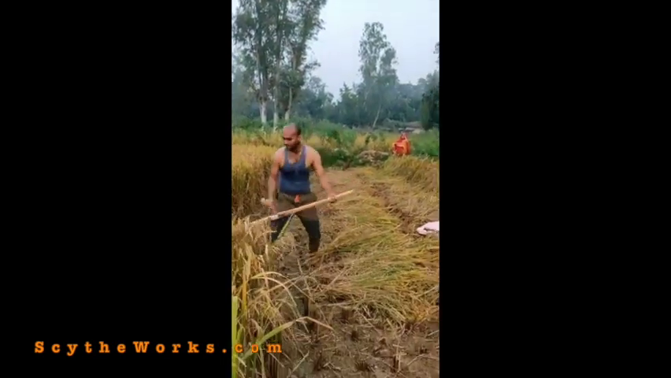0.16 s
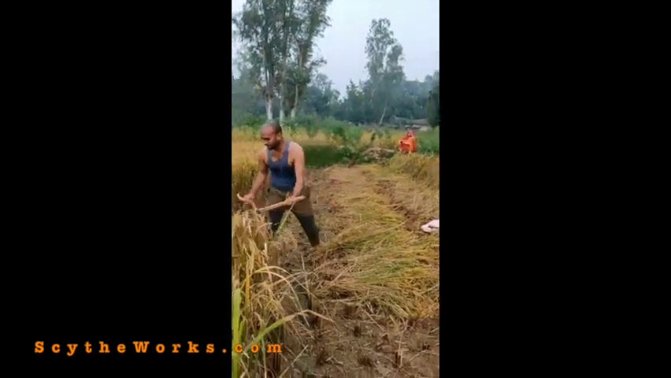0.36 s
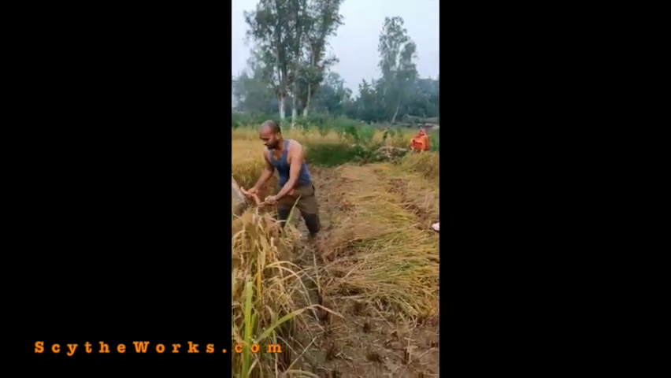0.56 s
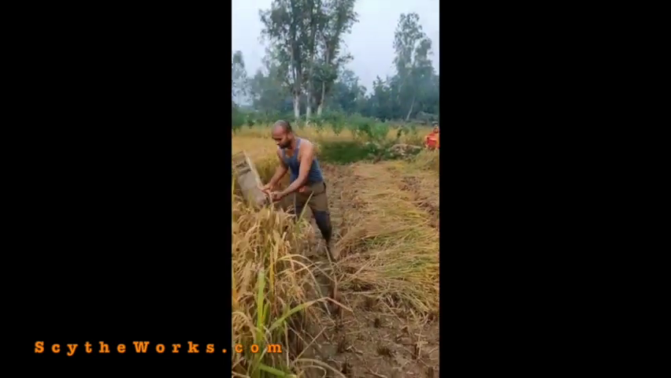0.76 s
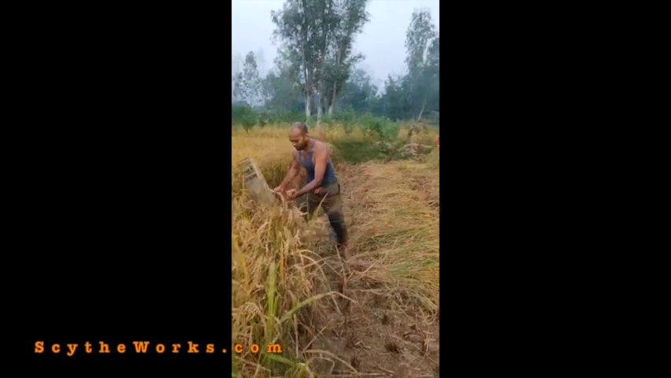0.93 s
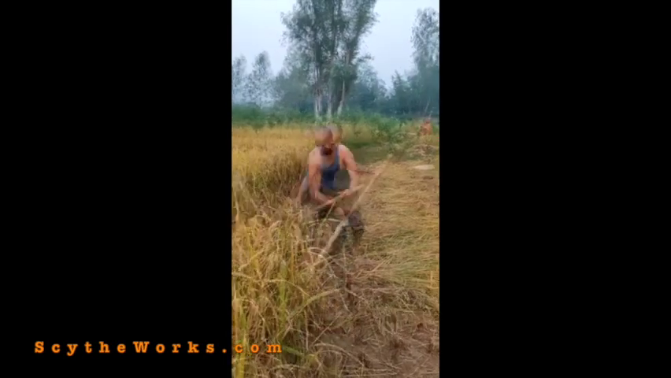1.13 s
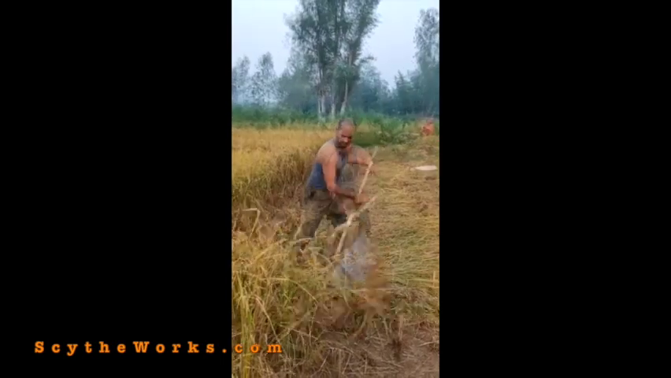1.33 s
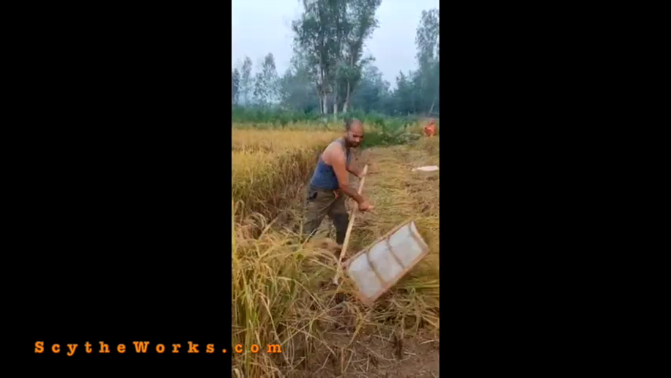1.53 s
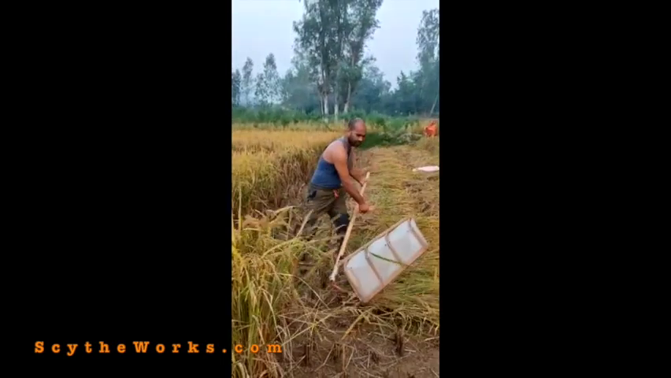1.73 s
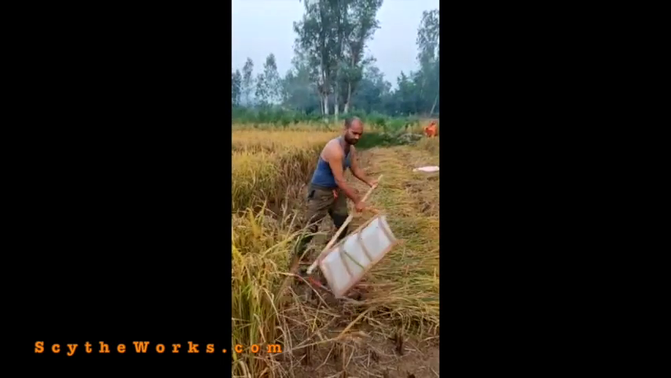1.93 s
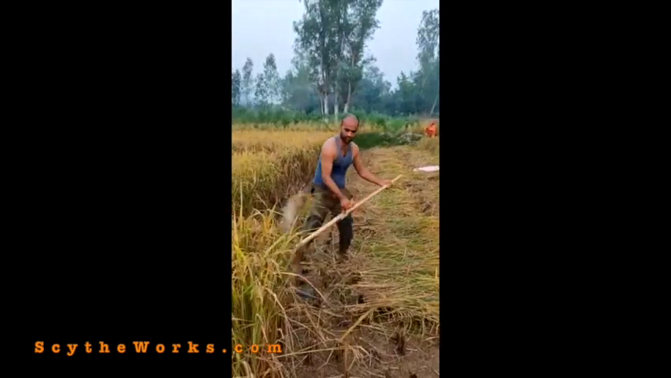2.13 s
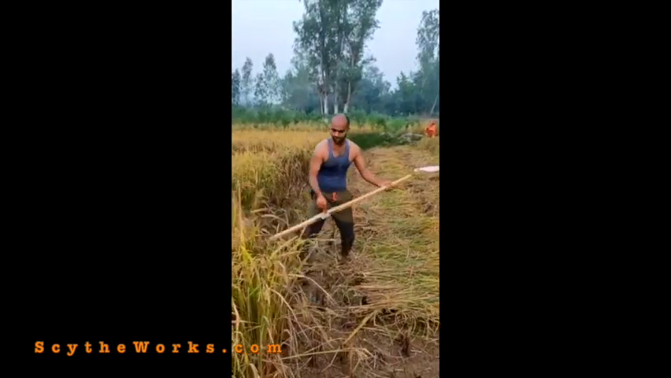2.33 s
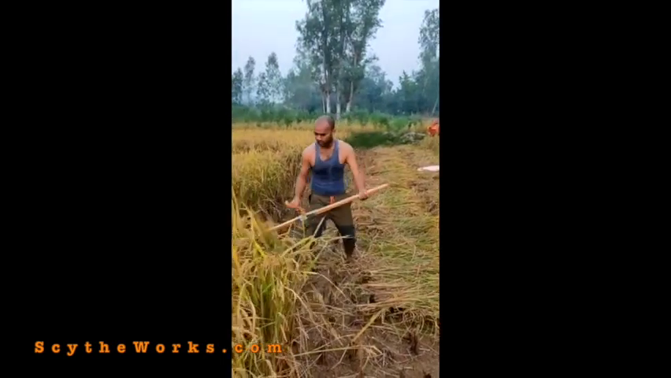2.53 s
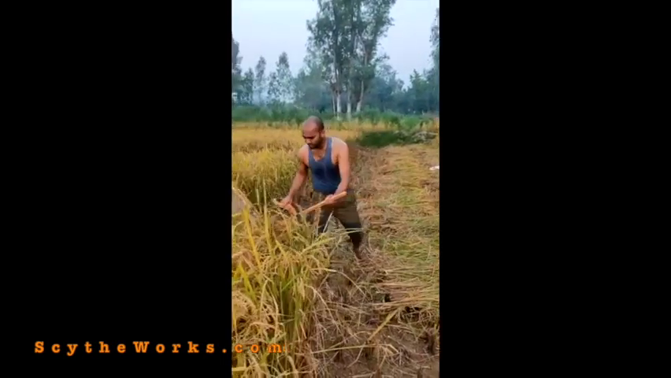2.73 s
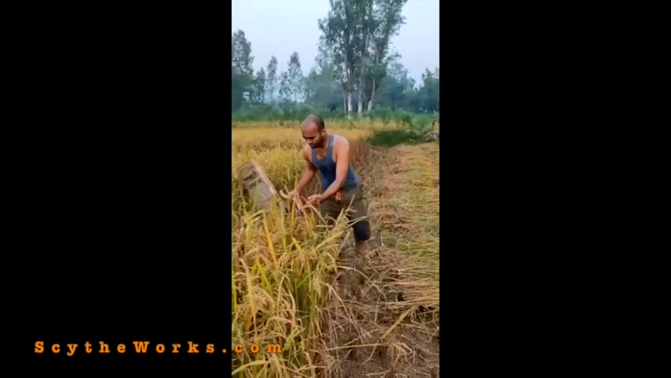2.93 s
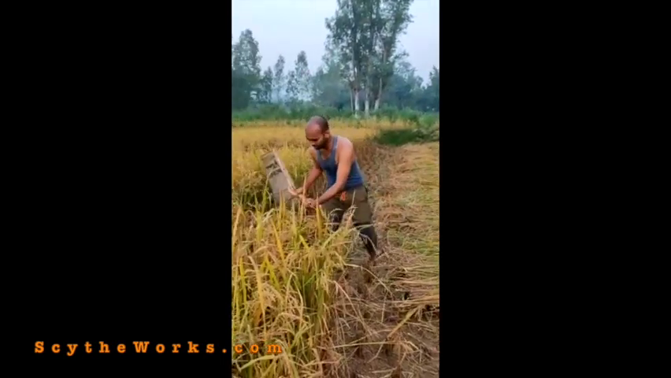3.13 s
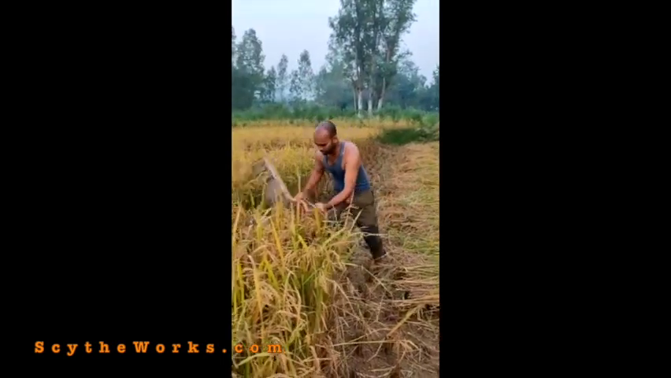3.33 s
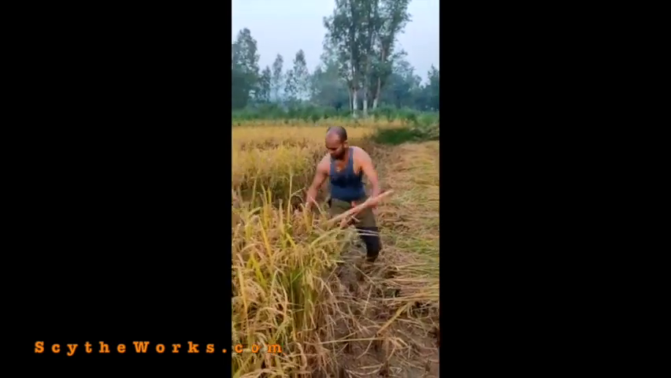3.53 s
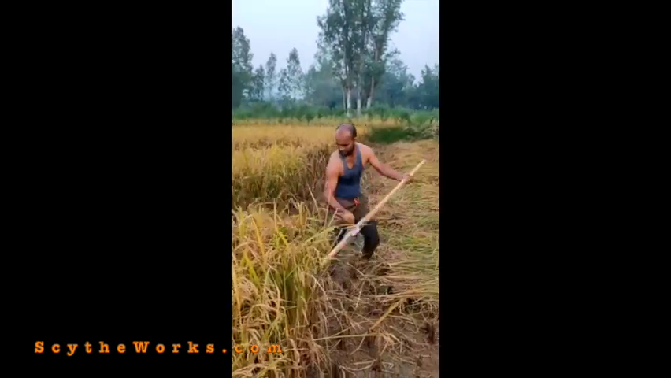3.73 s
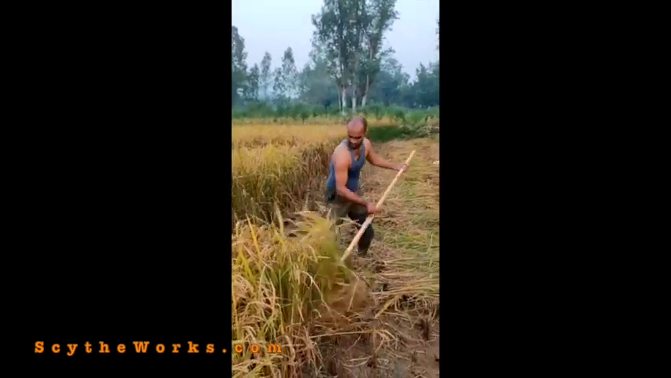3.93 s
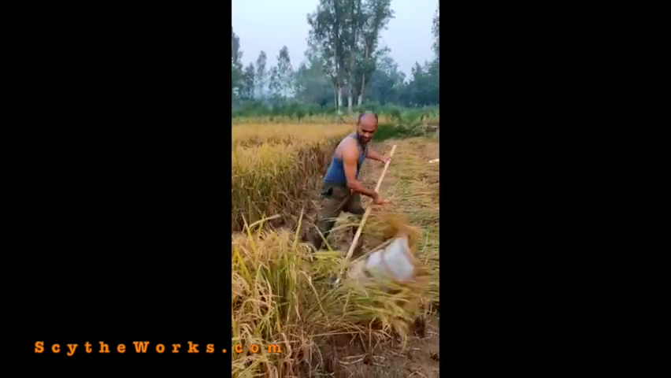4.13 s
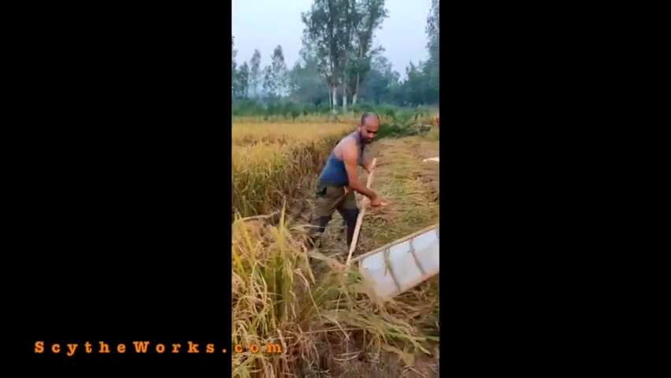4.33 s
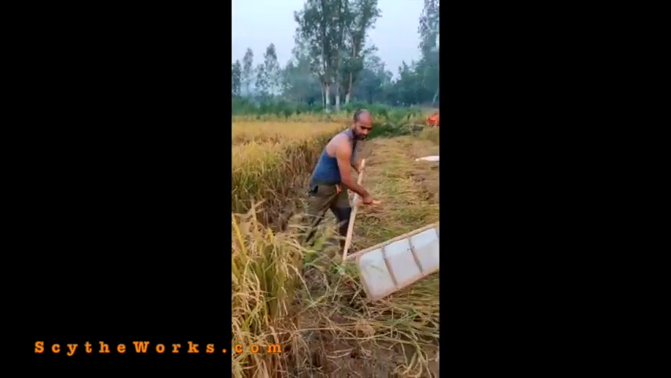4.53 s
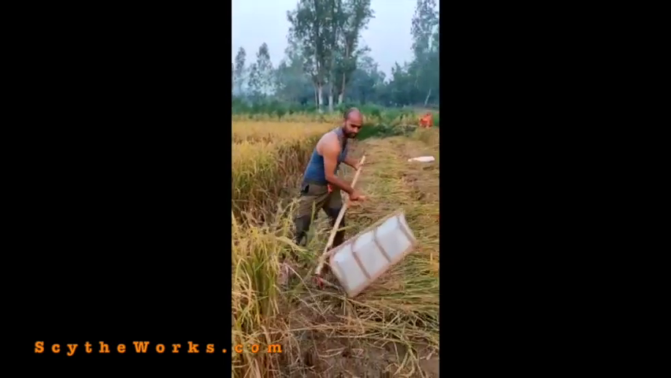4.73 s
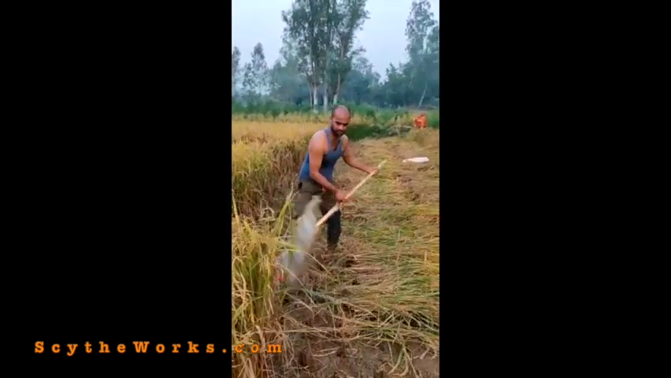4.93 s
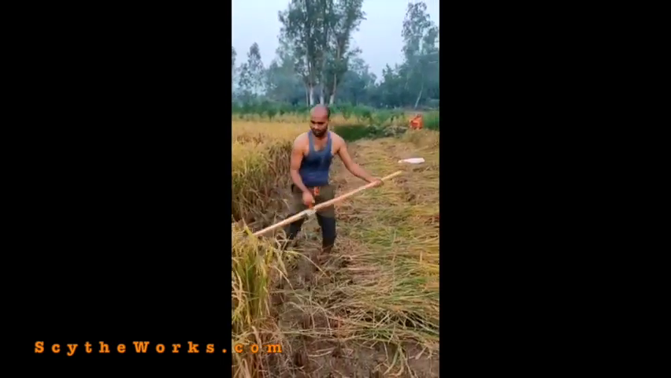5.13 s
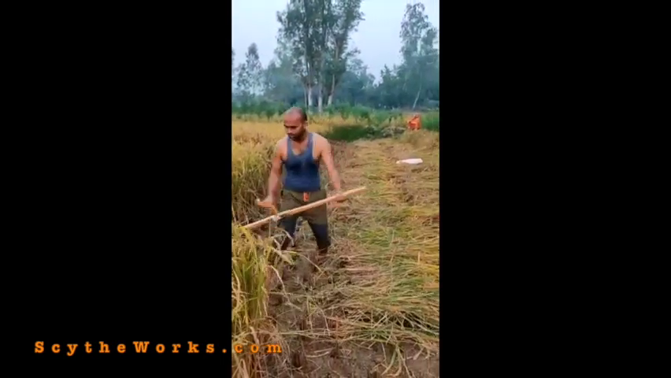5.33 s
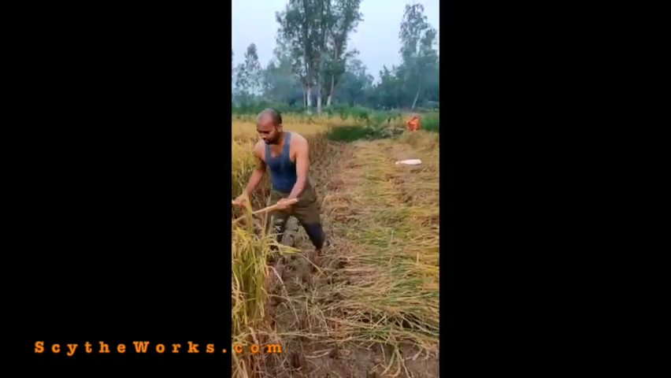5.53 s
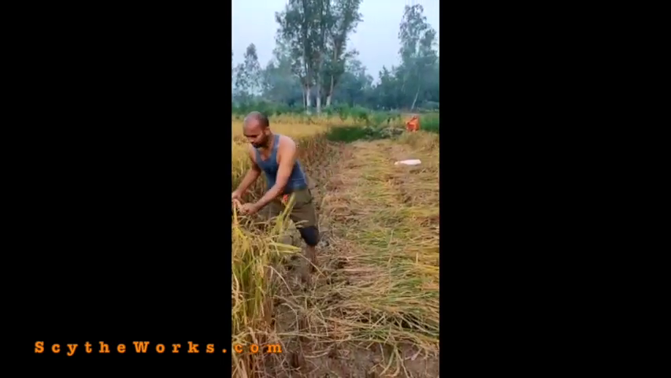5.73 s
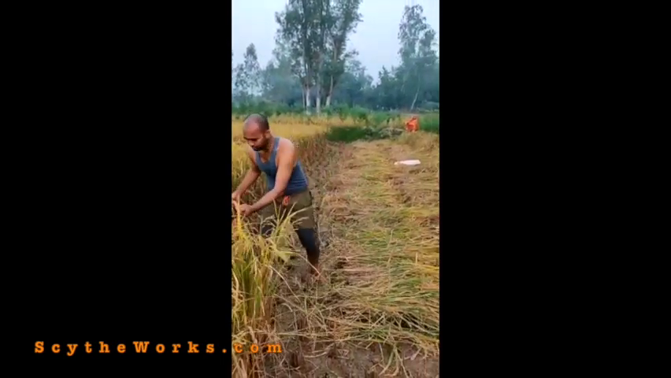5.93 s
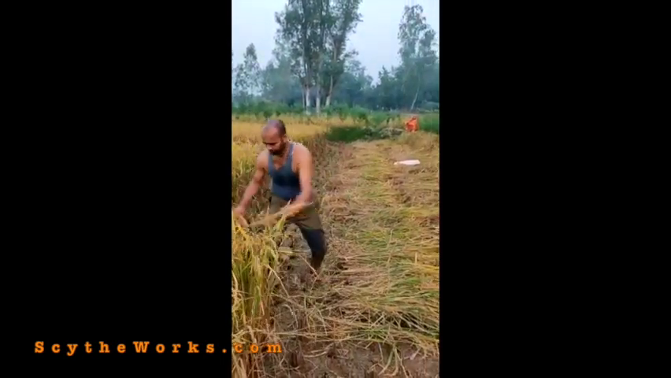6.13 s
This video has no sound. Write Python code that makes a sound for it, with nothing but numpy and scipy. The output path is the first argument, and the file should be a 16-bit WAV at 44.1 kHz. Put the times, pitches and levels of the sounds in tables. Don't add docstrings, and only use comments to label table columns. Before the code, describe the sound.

In a quiet open field, a scythe with a cradle mows dry, ripe grain close to the microphones. Leaves rustle, a first stroke swishes and crunches, and straw slides off. Lighter brushing and small snaps follow, then a much louder crackling stroke with a soft thud. After more scattered rustles and a lull, a third stroke just begins at the end. Far hoarse birds call faintly.

```python
import sys
import numpy as np
from scipy import signal
from scipy.fft import rfft, irfft, next_fast_len
from scipy.io import wavfile
from scipy.ndimage import uniform_filter1d

SR = 44100
rng = np.random.default_rng(int(sys.argv[2]) if len(sys.argv) > 2 else 0)


def invert_db(x):
    u = np.asarray(x, float) / 20
    return 10 ** u


def generate_wav(sig):
    pcm = np.round(np.clip(np.atleast_2d(sig).T, -1, 1) * 32767).astype(np.int16)
    wavfile.write(sys.argv[1], SR, pcm)


N = 276507

# start in seconds, leaf peak in dB, stalk peak in dB, straw pitch in Hz.
CRACKS = [(0.0655, -36, -39, 3024), (0.151, -28, -33, 1900), (0.197, -34, -37, 1590),
          (0.8558, -13.5, -25.5, 2700), (0.8579, -27, -34, 1200), (0.8695, -24, -32, 2484),
          (1.3473, -15, -24.5, 1970), (3.1945, -20, -42, 1900), (3.1975, -13, -34, 1650),
          (6.206, -25, -25, 700), (3.5373, -17, -19, 1670), (3.5742, -18, -27, 1280),
          (3.607, -13, -18, 1500), (1.163, -21, -31, 860), (1.215, -20, -29, 1500), (5.46, -35, -33, 1700),
          (3.2304, -22, -50, 1643), (3.6815, -5, -34, 1450), (3.6853, -2, -34, 1600),
          (3.648, -10, -30, 1500), (3.652, -8, -26, 1100), (2.2262, -30, -27, 1600),
          (2.237, -30, -21.5, 2200), (3.8327, -8, -34, 2110), (2.1744, -22, -26, 3100),
          (4.992, -23, -38, 1450), (5.97, -15, -31, 1820), (5.9775, -34, -33, 1760),
          (6.176, -20, -26, 1004), (6.2217, -20, -28, 940), (6.226, -19, -21, 1140)]
LEFT_RIGHT = np.array([[1], [-1]])


def at_hz(points, hz):
    points = np.array(points)
    return np.interp(np.log(hz + 1), np.log(points[:, 0]), points[:, 1])


def rms_one(x):
    return x / np.sqrt(np.mean(x ** 2) + 1e-20)


def drift(rate_hz):
    hop, settle = 40, 2000
    pole = np.exp(-2 * np.pi * rate_hz * hop / SR)
    noise = rng.standard_normal(N // hop + settle + 2)
    slow = signal.lfilter([1], [1, -2 * pole, pole * pole], noise)[settle:]
    return np.interp(np.arange(N) / hop, np.arange(len(slow)), rms_one(slow))


def fade(clicks, ms):
    return signal.lfilter([1], [1, -np.exp(-1000 / (max(ms, .05) * SR))], clicks + 1e-18)


def grains(per_s, spread_db, ms, clump_db, bed):
    born = rng.random(N) < per_s * invert_db(clump_db * drift(25)) / SR
    sizes = invert_db(2 * spread_db * np.minimum(rng.exponential(1, N), 4))
    power = fade(born * sizes, ms)
    return np.sqrt(bed + power / power.mean())


def coloured(loudness, spectrum, patchy_db, patch_rate, count):
    # frequency in Hz, left-right likeness from 0 to 1.
    likeness = [(60, 0.7), (130, 1), (290, 0.81), (640, 0.49), (1410, 0.28), (3100, 0.2), (6820, 0.022),
                (15000, 0.045)]
    # frequency in Hz, left over right in dB.
    ear_lean = [(60, 6), (300, 8), (700, 1), (1300, 8), (2400, 2.5), (4400, 2.5), (6000, -2.5),
                (7300, -10.5), (8200, -1.5), (9000, 13.5), (10000, 3.5), (12000, 4), (15000, 1.5)]
    size = next_fast_len(N)
    hz = np.fft.rfftfreq(size, 1 / SR)
    gain = invert_db(at_hz(spectrum, hz))
    gain /= np.sqrt(np.mean(gain ** 2))
    alike = np.clip(at_hz(likeness, hz), 0, 1)
    mid, side = rfft(rng.standard_normal((2, N)) * loudness, size) / np.sqrt(2)
    lean = invert_db(at_hz(ear_lean, hz) / 2 * LEFT_RIGHT)
    pair = gain * lean * (np.sqrt(1 + alike) * mid + np.sqrt(1 - alike) * side * LEFT_RIGHT)
    place = np.interp(np.log(hz + 1), np.log([spectrum[0][0], spectrum[-1][0]]), [0, count - 1])
    out = np.zeros((2, N))
    for k in range(count):
        share = np.clip(1 - abs(place - k), 0, 1)
        out += invert_db(patchy_db * drift(patch_rate)) * irfft(pair * share, size)[:, :N]
    return out


def movements(rows, still_db):
    edge_db = 20
    swell_bend = 1.3
    t = np.arange(0, N / SR + .002, .001)
    power = invert_db(2 * still_db)
    for s, db, swell_s, fade_s in rows:
        early = np.maximum(s - t, 0) / max(swell_s, .005)
        late = np.maximum(t - s, 0) / max(fade_s, .005)
        power = power + invert_db(2 * (db - edge_db * (early ** swell_bend + late)))
    return np.interp(np.arange(N) / SR, t, 10 * np.log10(power))


def breaks():
    # start in seconds, leaf peak in dB, stalk peak in dB, straw pitch in Hz.
    snaps = [(0.0872, -30, -28, 1790), (0.3311, -33, -35, 790), (0.4707, -22.5, -34.5, 2960),
             (0.6636, -50, -38, 1270), (0.789, -49, -49, 1620), (1.001, -22, -27, 1550),
             (1.086, -16.5, -46, 1610), (2.1013, -26.5, -24.5, 3350), (2.169, -19, -31, 3100),
             (3.7398, -13, -33, 2000), (5.972, -26, -44, 2900), (2.31, -28, -35, 2000),
             (2.3717, -36, -38, 1500), (2.2308, -29, -26, 1970), (2.2844, -22, -28.5, 2420),
             (2.3814, -39, -33, 1480), (2.459, -23, -27, 910), (2.5174, -36, -29.5, 1650),
             (2.5366, -23, -31, 1020), (3.2113, -34, -38.5, 1795), (3.3887, -66.5, -36.5, 1770),
             (3.4294, -23, -65, 3030), (3.453, -25, -31, 1520), (3.478, -24, -32, 810),
             (3.504, -29, -30, 930), (3.589, -20, -18, 1020), (3.636, -21, -22, 2390),
             (3.668, -12, -15, 894), (3.818, -18, -24.5, 790), (1.2, -26, -19.5, 1740),
             (1.262, -18, -22.5, 1600), (1.277, -22, -32, 1800), (2.424, -40, -49, 1000),
             (2.494, -40, -42, 1130), (4.935, -40, -40, 2330), (4.948, -36, -33, 2410),
             (5.18, -38, -31, 1650), (5.215, -29, -31.5, 2220), (3.6501, -17, -16.5, 944),
             (3.708, -5.5, -13.5, 1460), (4.4952, -22, -39, 1470), (4.633, -26, -38.5, 1830),
             (4.963, -26, -35.5, 1510), (5.0474, -18, -28, 3240), (5.1987, -38, -29, 1800),
             (5.328, -37, -33, 910), (5.39, -26, -33.5, 1190), (6.132, -30, -31, 1860),
             (6.155, -25, -29, 1035), (6.2081, -18, -29, 830)]
    snap_ms, crack_ms = 4.5, 1
    out = []
    for rows, ms in ((snaps, snap_ms), (CRACKS, crack_ms)):
        for s, leaf_db, stalk_db, hz in rows:
            thud_db = stalk_db - 11 - 11.5 * np.log2(hz / 1000)
            out.append((s, leaf_db, stalk_db, thud_db, hz, ms))
    return out


def bursts(column, stretch, swell):
    out = np.zeros(N)
    for row in breaks():
        start = round(row[0] * SR)
        t = np.arange(min(round(.08 * SR), N - start)) / SR
        life = max(stretch * row[5], .3) / 1000
        rise = (1 - np.exp(-t / (swell * life))) ** 2
        out[start:][:len(t)] += invert_db(row[column]) * np.exp(-t / life) * rise
    return out


def field():
    # frequency in Hz, spectrum level in dB per Hz.
    air_spectrum = [(12, -35), (20, 3.5), (86, 0.5), (198, -34), (458, -13), (717, -11.5), (780, -9),
                    (1290, -13.5), (2260, -18.5), (2450, -18), (2900, -24.5), (6710, -15), (8880, -12.5),
                    (10500, -27.5), (16000, -25)]
    return coloured(np.full(N, invert_db(-52)), air_spectrum, 0.98, 0.51, count=6)


def birds():
    # start in seconds, length in seconds, level in dB, top pitch in Hz, sag in Hz.
    caws = [
        (1.66, 0.28, -59, 1670, 90),
        (1.91, 0.22, -54, 1760, 110),
        (2.5, 0.28, -54, 1212, 40),
        (2.58, 0.46, -57, 1790, 300),
        (2.85, .32, -59.5, 1510, 110),
        (4.1, .5, -59, 1725, 249),
        (6.0, 0.22, -57, 1710, 84),
    ]
    width_hz, edge_s = 55, .07
    top = .25
    out = np.zeros(N)
    low_pass = signal.butter(2, width_hz, fs=SR, output="sos")
    rasp = rms_one(signal.sosfilt(low_pass, rng.standard_normal((2, N))))
    for s, length, db, hz, sag_hz in caws:
        t = np.arange(round(length * SR)) / SR
        here = slice(round(s * SR), round(s * SR) + len(t))
        pitch = hz - sag_hz * ((t / length - top) / (1 - top)) ** 2
        phase = 2 * np.pi * np.cumsum(pitch) / SR
        shape = np.clip(np.minimum(t, length - t) / edge_s, 0, 1)
        out[here] += invert_db(db) * shape * (rasp[0, here] * np.cos(phase) + rasp[1, here] * np.sin(phase))
    return out * invert_db(1.5 * LEFT_RIGHT)


def cradle():
    # loudest moment in seconds, level in dB, swell in seconds, fade in seconds, pitch in Hz.
    hums = [
        (.99, -50, 0.044, 0.06, 248),
        (1.19, -37.5, 0.11, 0.079, 730),
        (1.275, -41, 0.049, .04, 760),
        (3.57, -32.5, 0.04, 0.069, 208),
        (3.6, -37, 0.044, 0.049, 228),
        (3.6, -36, 0.071, 0.05, 900),
        (3.668, -31, 0.076, 0.074, 840),
        (6.208, -39, .02, 0.041, 223),
    ]
    half_width = 0.08
    out = np.zeros(N)
    rub = rng.standard_normal(N)
    for *row, hz in hums:
        here = slice(round(max(row[0] - .4, 0) * SR), round((row[0] + .3) * SR))
        band = [hz * (1 - half_width), hz * (1 + half_width)]
        ring = signal.sosfilt(signal.butter(1, band, "band", fs=SR, output="sos"), rub[here])
        out[here] += rms_one(ring) * invert_db(movements([row], -120)[here])
    return out * invert_db(2.5 * LEFT_RIGHT)


def sheaf():
    # loudest moment in seconds, level in dB, swell in seconds, fade in seconds.
    bumps = [(0.25, -58, 0.33, 1), (0.97, -49.5, 0.14, 0.52), (1.25, -44.5, 0.17, 0.23),
             (2.25, -55, 0.16, 0.31), (2.7, -54, 0.22, 0.15), (3.59, -38, 0.11, 0.42),
             (3.7, -35.5, 0.17, 0.14), (3.83, -43, 0.14, 0.059), (4.07, -58, 0.14, 0.76),
             (5.32, -55, 0.69, 0.55), (6.175, -42.5, 0.037, .1), (6.21, -37.5, 0.019, 0.058),
             (6.26, -42, 0.11, .5)]
    # frequency in Hz, spectrum level in dB per Hz.
    thud_spectrum = [(29, -57), (50, -6), (96, -7.5), (129, -4), (199, 1), (467, -3.5), (530, -12.5),
                     (600, -21), (780, -19), (1320, -120)]
    bump = invert_db(movements(bumps, still_db=-61)) * grains(80, 1.16, 15.0, 6.5, 0.27)
    thud = invert_db(6.5) * bursts(3, stretch=1.17, swell=0.37)
    return coloured(np.hypot(bump, thud), thud_spectrum, 0.67, 25, count=3)


def brushing():
    # loudest moment in seconds, level in dB, swell in seconds, fade in seconds.
    brushes = [(0.0, -38.5, .1, 0.084), (0.1, -38.5, 0.075, 0.12), (0.36, -40.5, 0.33, 0.93),
               (0.97, -41, 0.15, .5), (1.13, -32, 0.27, 0.66), (1.23, -28.5, 0.19, 0.22),
               (1.35, -32, 0.23, 0.47), (1.75, -34.5, 0.31, 0.13), (1.84, -51.5, .1, 0.34),
               (2.11, -44.5, .015, .4), (2.18, -37, 0.018, 1), (2.68, -38.5, 0.39, 0.63),
               (3.1, -46.5, 0.062, 0.25), (3.19, -41, 0.03, 0.092), (3.225, -40.5, .05, 0.046),
               (3.52, -29.5, 0.1, 0.49), (3.65, -22, 0.18, 0.69), (3.86, -26, 0.15, 0.36),
               (4.05, -33.5, 0.41, 0.075), (4.5, -35.5, 0.44, 0.31), (4.66, -51.5, .1, .5),
               (4.98, -39, 0.05, 0.32), (5.05, -37, 0.096, 0.45), (5.21, -38, 0.38, 0.17),
               (5.42, -41, 0.33, 0.37), (5.6, -42, 0.76, 0.44), (6.134, -41, 0.005, 1),
               (6.215, -29.5, 0.039, 1)]
    return movements(brushes, still_db=-54)


def crushing(rustle_db):
    # loudest moment in seconds, level in dB, swell in seconds, fade in seconds,
    # thick bundles over single stems in dB.
    crushes = [(0.1, -36, 0.044, 0.065, -1), (0.238, -42, 0.16, 0.56, -3.5), (0.95, -56, 0.076, .4, -13),
               (1.191, -35, 0.5, 0.39, -4), (1.28, -30.5, 0.23, 0.15, -6), (1.05, -44, 0.13, .3, -8),
               (1.41, -36, 0.19, 0.11, -7.5), (1.7, -49, 0.19, 0.24, -5.5),
               (2.105, -42.5, 0.018, 0.37, -11.5), (2.235, -36.5, 0.06, 0.033, -7),
               (2.39, -43.5, 0.092, 1, -3.5), (2.66, -49, 0.84, 0.75, -3), (3.46, -50, 0.03, .2, -5),
               (3.51, -39, 0.064, 0.33, 5), (3.58, -24.5, 0.12, 0.36, -8.5), (3.66, -23, 0.21, 0.22, -7),
               (3.83, -28, 0.058, 0.19, -9), (4.05, -41, 0.12, 0.17, -3.5), (4.47, -49, 1, 0.35, -3),
               (4.965, -38.5, 0.046, 0.79, -8.5), (5.199, -35.5, 0.027, 0.072, -3),
               (5.34, -43.5, 0.058, 0.34, -0.5), (5.41, -41, 0.082, 0.2, -1.5),
               (6.134, -42, 0.005, 0.65, 1), (6.207, -30, 0.028, 1, -1)]
    crunch_db = movements([row[:4] for row in crushes], still_db=-60)
    knock_db = rustle_db - 11.5
    crunch_db = 10 * np.log10(invert_db(2 * crunch_db) + invert_db(2 * knock_db))
    thick = [(s, db + thick_db, swell_s, fade_s) for s, db, swell_s, fade_s, thick_db in crushes]
    return crunch_db, movements(thick, still_db=-64.5)


def leaves(rustle_db):
    # frequency in Hz, spectrum level in dB per Hz.
    leaf_spectrum = [(1470, -52), (2500, -18.5), (2810, -20.5), (3570, -19), (5650, -13), (6590, -7.5),
                     (7350, -1), (7760, 1.5), (9210, -4), (10500, -15.5), (11400, -19), (14700, -24.5),
                     (16000, -10.5)]
    rub = invert_db(rustle_db) * grains(1500, 0.36, 0.98, 2.7, 0.81)
    snap = invert_db(-2.5) * bursts(1, stretch=1.0, swell=0.28)
    return coloured(np.hypot(rub, snap), leaf_spectrum, 0.92, 3.2, count=5)


def stalks(crunch_db, bundle_db):
    # frequency in Hz, spectrum level in dB per Hz.
    stem_spectrum = [(680, -46), (1150, -8.5), (1690, -1.5), (2190, -6), (3110, -4.5), (3590, -10.5),
                     (5000, -7.5), (6500, -6.5), (11000, -120)]
    # frequency in Hz, spectrum level in dB per Hz.
    bundle_spectrum = [(240, -14.5), (400, -5.5), (529, -9), (690, -4.5), (1050, -2), (1360, -15.5),
                       (2310, -120)]
    crush = grains(450, 2.3, 2, 3.2, .6)
    snap = bursts(2, stretch=1.27, swell=0.57)
    stems = np.hypot(invert_db(crunch_db - 3.0) * crush, invert_db(2.5) * snap)
    bundles = np.hypot(invert_db(bundle_db - 5.0) * crush, invert_db(-4.5) * snap)
    return (coloured(stems, stem_spectrum, 1.3, 15.5, count=4)
            + coloured(bundles, bundle_spectrum, 1.2, 36, count=3))


def straws():
    out = np.zeros(N)
    t = np.arange(round(.02 * SR)) / SR
    for s, leaf_db, stalk_db, thud_db, hz, ms in breaks():
        start = round(s * SR)
        way = rng.choice([-1, 1])
        ring = way * invert_db(stalk_db - 6.5) * np.exp(-t * hz / 6.0) * np.sin(2 * np.pi * hz * t)
        out[start:][:len(t)] += ring[:N - start]
    return out * invert_db(1.5 * LEFT_RIGHT)


def cracks():
    port_hz = (8000, 7800)
    port_ms = .22
    step_hz, step_ms, step_db = 2360, 0.36, -2.5
    out = np.zeros((2, N))
    t = np.arange(round(.005 * SR)) / SR
    swell = 2718 * t / port_ms * np.exp(-1000 * t / port_ms)
    ring = swell * np.sin(2 * np.pi * np.outer(port_hz, t))
    step = invert_db(step_db) * np.exp(-1000 * t / step_ms) * np.sin(2 * np.pi * step_hz * t) * [[1.3], [.9]]
    for s, leaf_db, stalk_db, hz in CRACKS:
        out[:, round(s * SR):][:, :len(t)] += invert_db(leaf_db - 5) * ring + invert_db(stalk_db) * step
    return out


def panned(near):
    # time in seconds, left over right in units of 3.2 dB.
    blade_place = [(0, 0), (0.37, -1), (0.77, 0.5), (0.95, -0.5), (1.3, -1.0), (1.55, 0.25), (2.2, -0.2),
                   (3.0, -1), (3.2, 0.2), (3.3, -0.5), (3.65, -1), (3.77, 1), (3.86, -0.5), (4.5, 0.2),
                   (5.05, -1), (5.6, -1), (6.27, -1)]
    s, lean_db = np.transpose(blade_place)
    pan_db = np.interp(np.arange(N) / SR, s, lean_db)
    return near * invert_db(1.6 * pan_db * LEFT_RIGHT)


def scene():
    rustle_db = brushing()
    crunch_db, bundle_db = crushing(rustle_db)
    near = leaves(rustle_db) + stalks(crunch_db, bundle_db) + straws() + cracks()
    return panned(near) + sheaf() + field() + birds() + cradle()


def masked(x):
    # frequency in Hz, share of the time shut in mid or side, in both, on the left only.
    shut = [(1500, 0, 0, 0), (2200, .08, .02, 0), (2800, .15, .05, 0), (3200, .12, .04, 0),
            (3600, .34, .06, 0), (4400, .3, .12, .04), (5000, .22, .1, .08), (5700, .2, .13, .24),
            (6300, .06, .06, .3), (6900, 0, 0, .2), (7500, 0, 0, 0), (9300, 0, 0, 0), (10200, .1, .36, 0),
            (11000, .15, .34, 0), (12500, .2, .48, 0), (14800, .15, .42, 0), (15300, 0, .85, 0)]
    # start in seconds, length in seconds, centre
    # in Hz, width in Hz.
    spells = [(.02, .1, 4600, 200), (.66, .12, 4100, 250), (.93, .11, 3550, 300), (1.1, .08, 3650, 250),
              (1.58, .19, 3500, 350), (2.4, .1, 4200, 200), (2.93, .11, 4150, 300), (3.2, .1, 3500, 350),
              (3.645, .04, 4100, 500), (4.4, .2, 3550, 400), (4.8, .12, 3500, 350), (5.25, .06, 3600, 250),
              (5.4, .22, 3600, 150), (5.66, .09, 3450, 400), (5.83, .07, 4000, 250), (5.99, .19, 3600, 200)]
    frame, lead = 1024, 1024 - 565
    patch_bins, patch_hops = 9, 4
    pair = np.pad(np.array([x[0] + x[1], x[0] - x[1]]) / 2, ((0, 0), (lead, 0)))
    hz, s, cells = signal.stft(pair, SR, "cosine", 2 * frame)
    luck = uniform_filter1d(rng.standard_normal((4, len(hz), len(s))), patch_bins, axis=1)
    luck = uniform_filter1d(luck, patch_hops, axis=2)
    chance = luck.argsort(axis=None).argsort().reshape(luck.shape) / luck.size
    chance = chance / rng.uniform(.4, 1.6, len(s))
    share = np.array([at_hz(np.array(shut)[:, [0, k]], hz)[:, None] for k in (1, 1, 2, 3)])
    passed = (chance > share) / np.sqrt(1 - share)
    mid, side = cells * passed[:2] * passed[2]
    for start, length, centre, width in spells:
        mid[abs(hz - centre) < width / 2] *= abs(s - lead / SR - start - length / 2) > length / 2
    sides = np.array([(mid + side) * passed[3], mid - side])
    return signal.istft(sides, SR, "cosine", 2 * frame)[1][:, lead:lead + N]


def top_cut(x):
    return signal.sosfilt(signal.butter(12, 15800, fs=SR, output="sos"), x)


def record(dry):
    rounded = .8 * np.tanh(dry / .8)
    low_pass = signal.cheby2(10, 60, 16300, fs=SR, output="sos")
    mix = masked(signal.sosfilt(low_pass, rounded))
    return top_cut(mix)


dry = scene()
out = record(dry)
generate_wav(out)
```